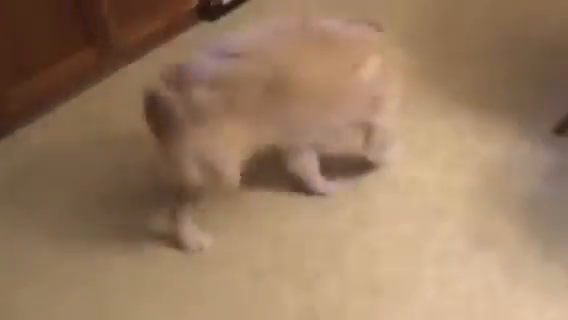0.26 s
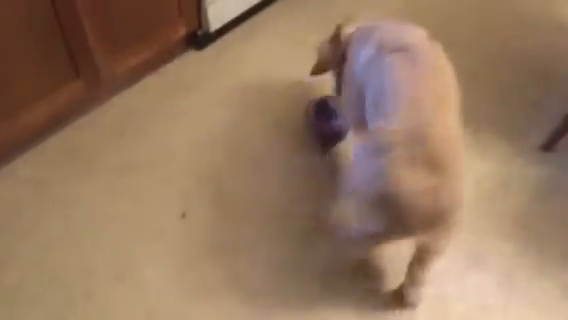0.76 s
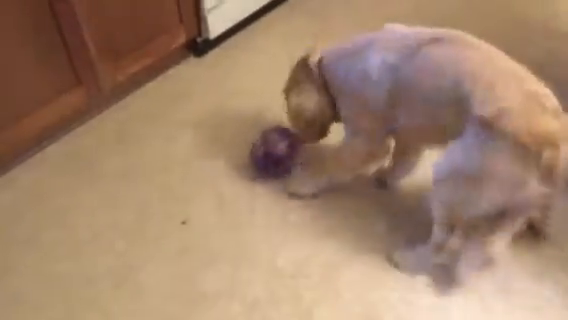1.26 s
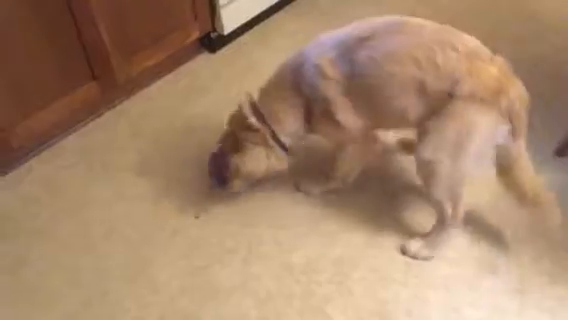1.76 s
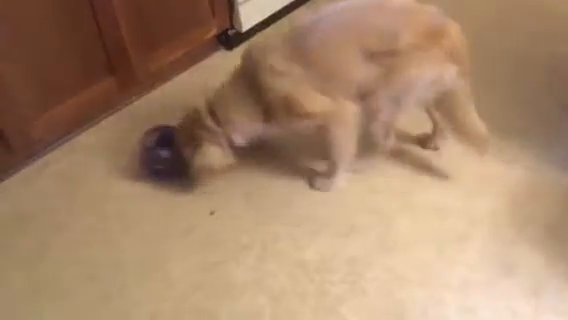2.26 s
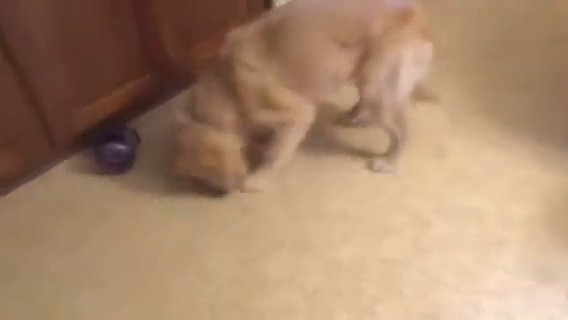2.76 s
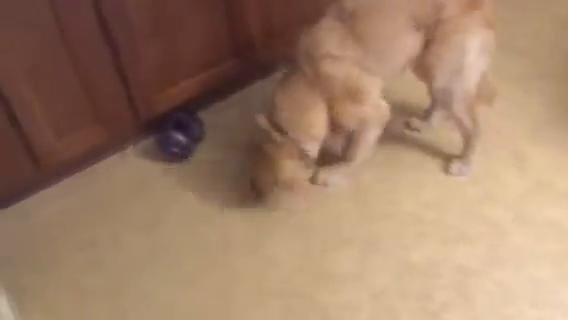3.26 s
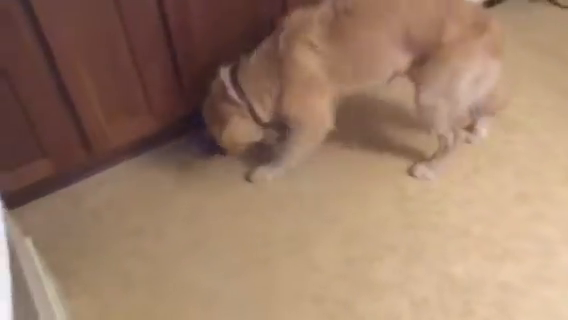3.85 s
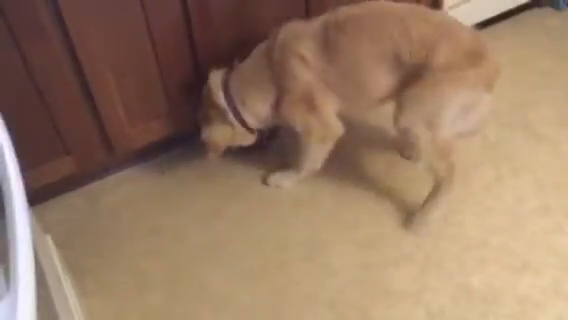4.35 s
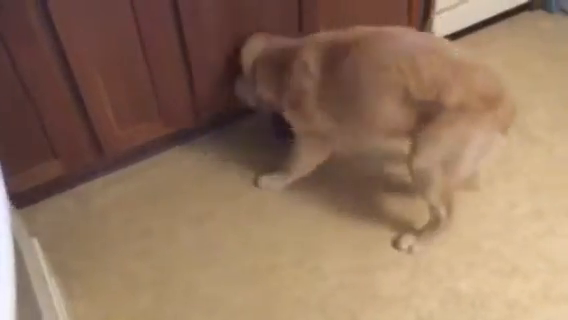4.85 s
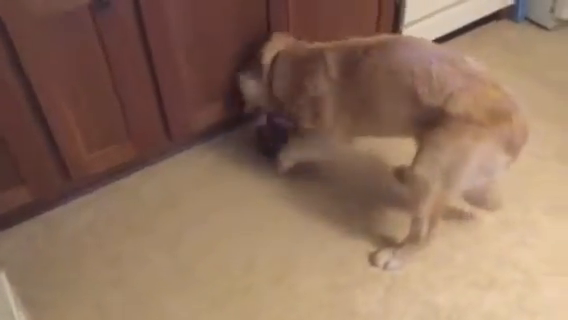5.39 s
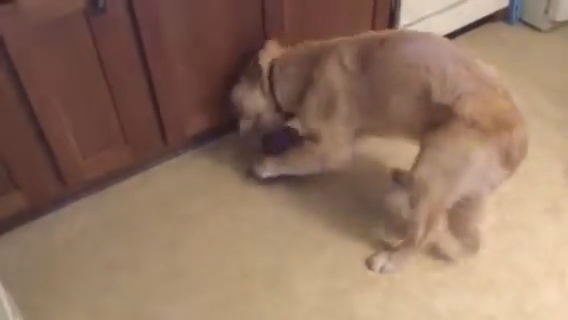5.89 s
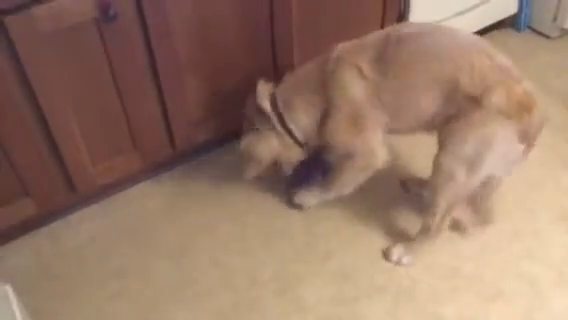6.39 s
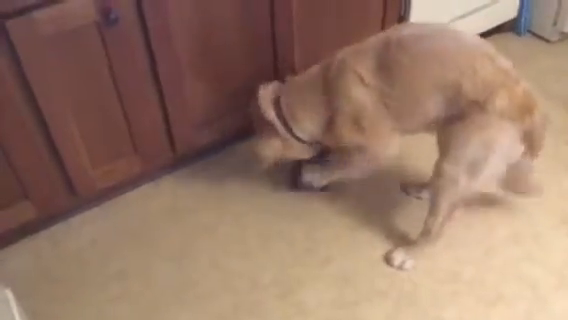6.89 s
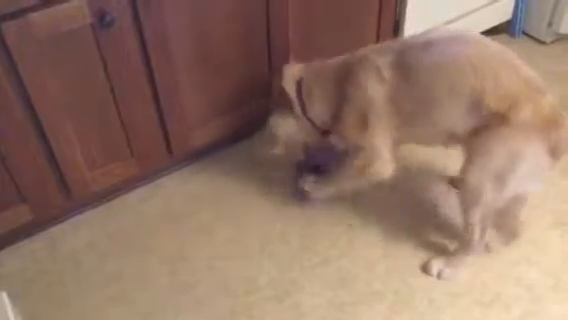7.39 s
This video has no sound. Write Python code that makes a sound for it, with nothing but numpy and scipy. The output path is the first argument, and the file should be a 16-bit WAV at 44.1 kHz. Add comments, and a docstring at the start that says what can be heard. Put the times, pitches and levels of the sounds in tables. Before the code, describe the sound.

A small, lively kitchen with a faint steady low hum, picked up by one small microphone. At 0 s a brief kibble rattle and soft knock fade quickly, leaving light claw ticks and faint scuffs. At about 1.05 s the hollow plastic toy clacks sharply on the floor and a surging rattle and rub begins, with small clacks until 1.9. A fuller low floor knock lands at 1.93, followed by more rattling. Short scrapes lead into a woody cupboard bump at 2.9, then ticks and scrapes, quieter around 3.6. From 4.2 the toy is wedged at the door, rumbling; strong hollow thuds come at 4.6 and 4.7, with smaller bumps to 5.4. Scrapes, clacks and claws stay busy until 6, then thin out. Around 7.05-7.3 dull thuds and the strongest scrape bring the rattle back, ending with a clack at 7.6.

```python
"""In a small bright kitchen a dog noses and paws a hard plastic feeder toy over the floor and into a cupboard door.
Blows ring low modes of floor and door; the hollow shell clacks and pings through its resonances.
Rubbing and tumbling kibble excite the same shell, strokes scrape, claws tick in pairs, the rolling toy rumbles.
Reflections answer all but the rumble and a faint steady hum."""
import sys
import numpy as np
from scipy import signal
from scipy.io import wavfile
from scipy.ndimage import uniform_filter1d

SR = 44100
rng = np.random.default_rng(int(sys.argv[2]) if len(sys.argv) > 2 else 0)


def to_wav(sig):
    """Store sig (one row per channel, or 1-D mono) as 16-bit WAV at the path in sys.argv[1].

    Samples outside -1..1 are clipped; the rate is SR.
    """
    pcm = np.clip(np.atleast_2d(sig), -1, 1) * 32767
    pcm = np.round(pcm).astype(np.int16)
    wavfile.write(sys.argv[1], SR, pcm.T)  # frames by channels


N = 336527
FREQS = np.fft.rfftfreq(4096, 1 / SR)  # Hz, grid for all filter curves

# colour of rubbing and kibble: (frequency [Hz], relative density [dB])
SLIDE_COLOUR = [(200, 7), (600, -21.5), (1000, 4), (1450, 0), (2600, 1.5), (4000, 1.5), (6000, -4),
                (9000, -15), (16000, -28)]


def door_bumps():
    """The toy strikes the cupboard door, which rings in its panel modes."""
    # blows: (time [s], relative level at corner [dB], corner [Hz], loss below corner [dB/octave])
    bumps = [(2.907, -20.5, 328, 20.5), (2.99, -32, 310, 29), (4.381, -40.5, 570, -5.5),
             (4.409, -27.5, 486, 5.5), (4.431, -34.5, 365, 3), (4.611, -18, 290, 8.5),
             (4.639, -32.5, 600, 0), (4.667, -45, 560, -6), (4.72, -19.5, 398, 18.5), (4.742, -34, 600, 23),
             (4.79, -38, 460, -4.5), (4.86, -33.5, 180, 23), (5.048, -42, 162, -6), (5.173, -38, 520, -4),
             (5.215, -30, 92, 0), (5.356, -39.5, 310, 23), (5.399, -39, 475, 0.5)]
    # door modes: (frequency [Hz], relative level [dB], t60 [s])
    modes = [(88.6, -1, 0.3), (120, -19, 0.059), (154.6, -5, 0.26), (189.4, 1, 0.27), (251, -2, 0.059),
             (307.2, 4, 0.096), (344, -7, 0.12), (398, -11, 0.14), (489, -1, 0.076), (568.4, -3.5, 0.11),
             (712, -22, 0.16), (813, -15, 0.067), (953, -22, 0.13)]
    return knocks(bumps, modes, level_db=-3.0, rise_s=0.003, thud_db=-10.0, thud_s=0.023)


def floor_knocks():
    """Toy and paws strike the open floor; floor and toy ring together."""
    # blows, harder contact = higher corner:
    # (time [s], relative level at corner [dB], corner [Hz], loss below corner [dB/octave])
    blows = [(0.003, -45.5, 400, 3), (0.038, -37, 257, 5.5), (0.17, -42, 284, 2), (0.215, -59, 400, -6.5),
             (0.679, -48, 327, 4.5), (1.054, -32, 360, 12.5), (1.084, -42, 382, 17),
             (1.137, -43, 376, 13.5), (1.575, -45.5, 202, 20), (1.931, -24.5, 241, 8.5),
             (1.965, -35.5, 190, 23), (2.025, -40.5, 262, 3.5), (2.303, -47.5, 130, 9), (2.53, -51, 110, 6),
             (2.75, -53, 118, -3), (3.034, -43.5, 320, 0.5), (5.659, -48.5, 150, 6),
             (5.749, -44.5, 480, 3.5), (6.068, -39.5, 161, 28), (6.473, -57, 560, 1.5),
             (7.049, -39.5, 298, 44), (7.077, -36, 184, 8), (7.108, -36, 178, 17)]
    # modes of the floor and the toy on it: (frequency [Hz], relative level [dB], t60 [s])
    modes = [(55, -3.5, 0.32), (85.5, -4.5, 0.32), (123.8, 0, 0.18), (149.8, 2.5, 0.18), (195, -3.5, 0.16),
             (242.5, 0, 0.15), (304.5, -1.5, 0.18), (333.6, 0, 0.15), (675, 2.5, 0.11), (1032, -6.5, 0.16)]
    return knocks(blows, modes, level_db=-2, rise_s=0.0065, thud_db=-9.0, thud_s=0.028)


def knocks(blows, modes, level_db, rise_s, thud_db, thud_s):
    """Each blow drives the low modes by its force spectrum and adds a short dull noise thud."""
    out = np.zeros(N)
    t = np.arange(SR // 2) / SR
    hz, mode_db, t60_s = np.transpose(modes)[:, :, None]
    attack = 1 - np.exp(-t / rise_s)
    rings = amp(mode_db - 60 * t / t60_s) * np.sin(2 * np.pi * hz * t) * attack
    rings *= (-1) ** (np.arange(len(modes)) // 2)[:, None]  # polarity alternates in pairs
    skirts_db = read([(20, -10), (45, -11), (75, -1.5), (650, 6), (1400, -13.5), (5000, -50)], FREQS)
    per_band_db = 10 * np.log10(SR / (FREQS + 20))  # higher bands spread their energy more widely
    for s, *blow in blows:
        ringing = (amp(force_db(hz, *blow)) * rings).sum(0)
        add(out, s, 2 * amp(level_db) * ringing)
        noise = rng.standard_normal(len(t)) * attack * np.exp(-t / thud_s)
        thud = colour(noise, force_db(FREQS, *blow) + skirts_db + per_band_db)
        add(out, s, amp(thud_db) * thud)
    return out


def force_db(hz, level_db, corner_hz, lightness):
    """Blow spectrum: its duration cuts force above the corner; a light blow also lacks bass."""
    softness_db_per_octave = 17.5
    octaves = np.log2(np.clip(hz, 80, 600) / corner_hz)  # slopes act from 80 to 600 Hz
    below_db = lightness * np.minimum(octaves, 0)
    above_db = softness_db_per_octave * np.maximum(octaves, 0)
    return level_db + below_db - above_db


def rattles(gain_db=-1, ring_db=6, ring_width_hz=450, ping_db=-1, ping_s_at_3khz=0.0049):
    """The shell clacks, pinging at one pitch, and the kibble chatters against it."""
    # clacks: (time [s], relative level [dB], middle tilt [dB], treble tilt [dB], strongest ring [Hz])
    clacks = [(0.003, -42.5, 0, -9, 3780), (0.028, -47, 9, -3, 970), (0.611, -53.5, 10.5, -21, 3600),
              (1.05, -38.5, 8, -37, 3470), (1.059, -38.5, -2, -20.5, 3380), (1.085, -47, -21, -1, 3350),
              (1.148, -46.5, 6.5, -5, 2960), (1.334, -52.5, 6, -12, 3900), (1.4, -47.5, -39, -14, 3970),
              (1.452, -57, -15, -17, 5700), (1.511, -46, -8.5, -9, 8600), (1.574, -47, -8.5, -20, 4200),
              (1.635, -48, -14, -16, 3130), (1.701, -50.5, -8, -27, 2880), (1.822, -54.5, -7, -12, 3840),
              (1.855, -55, -7, -12, 3140), (1.933, -44.5, 3, -7, 3230), (2.02, -48, -8, -11, 3700),
              (2.907, -41, 14, -7.5, 3500), (4.207, -46, 5.5, -15.5, 3080), (4.382, -49, 23, -14, 1610),
              (4.412, -47, 5.5, -15, 1020), (4.6094, -35, 3.5, -25, 1705), (4.722, -40, 17.5, -10.5, 2450),
              (5.278, -51.5, -28, -14, 8600), (5.386, -40, -2, -15.5, 3440), (5.404, -54, 23, 7, 3370),
              (5.57, -44.5, -7, -11, 3410), (5.91, -54.5, 4, -21, 2080), (5.98, -57, -11, -24, 2170),
              (6.068, -49.5, 16, -10, 2140), (6.133, -53.5, -25, -9.5, 8250), (6.302, -64, 1, -13, 2300),
              (6.388, -67, -18, -12, 3170), (6.471, -56.5, 2.5, -13, 4200), (6.575, -58, 21, 3, 3030),
              (6.728, -54.5, -8, -26, 5570), (7.209, -49, -12, -1, 3700), (7.272, -44, -27, -19, 3060),
              (7.587, -44.5, -18, -13.5, 3110)]
    out, shell_db = np.zeros(N), shell()
    t = np.arange(len(FREQS)) / SR
    for s, level_db, middle_db, treble_db, ring_hz in clacks:
        tilt = [(150, middle_db + 6), (600, middle_db), (1400, middle_db), (3800, 3.5),
                (10000, treble_db + 5.0), (16000, treble_db - 6.0)]
        clack_db = shell_db + peak(ring_hz, ring_width_hz, ring_db) + read(tilt, FREQS)
        add(out, s, contact(clack_db, level_db + gain_db, touch_s=0.0021, chatter=1.6, chatter_s=0.0077))
        decay = np.exp(-t / ping_s_at_3khz * ring_hz / 3000)  # higher rings die sooner
        ping = np.sin(2 * np.pi * ring_hz * t) * decay * (1 - np.exp(-t / 0.00052))
        add(out, s, amp(level_db + ping_db) * ping)
    return out


def shell():
    """Power response of the hollow shell in dB: resonant peaks on a flat base."""
    # resonances: (frequency [Hz], half-power width [Hz], peak over the base [dB])
    resonances = [(996, 73, 5), (2097, 156, 6.5), (3094, 110, 5.5), (3385, 120, 2.5), (3826, 97, 2.5),
                  (4510, 740, -3.5), (5840, 1400, -2.5), (8650, 640, 1)]
    power = 1
    for hz, width_hz, db in resonances:
        power = power + amp(db) ** 2 / (1 + (2 * (FREQS - hz) / width_hz) ** 2)
    return 10 * np.log10(power)


def slide(shell_db=-2.5, kibble_db=-4, scuff_db=-73, scuff_follow=0.41, surge_db=2,
          sing_hz=2110, sing_width_hz=110, sing_db=5):
    """Surging friction and loose kibble excite the shell; paws scuff faintly as the dog follows."""
    # scuff colour: (frequency [Hz], relative density [dB])
    scuff_colour = [(3000, 7), (6500, 0), (9500, 4.5), (13000, 2.5), (16000, -2)]
    pace_db = motion_db()
    wander = uniform_filter1d(uniform_filter1d(rng.standard_normal(N), size=700), size=400)
    surge = evened(amp(surge_db * evened(wander)))
    # rubbing favours one shell mode
    rub_db = shell() + peak(sing_hz, sing_width_hz, sing_db) + read(SLIDE_COLOUR, FREQS)
    rub = evened(colour(grains(per_s=1100, spread_db=2.5, smooth=1.0), rub_db))
    scuff = evened(colour(grains(per_s=300, spread_db=5.5, smooth=4.4), read(scuff_colour, FREQS)))
    toy = amp(shell_db) * rub * surge + amp(kibble_db) * kibble(per_s=130, spread_db=1.5)
    scuff_gain = amp(scuff_db + scuff_follow * (pace_db - pace_db.mean()))
    return toy * amp(pace_db) + scuff * scuff_gain


def kibble(per_s, spread_db, count=24):
    """Pieces of dry food tumble against the shell, each with its own small ring."""
    out = np.zeros(N)
    shell_db = shell() + read(SLIDE_COLOUR, FREQS)
    pieces = []
    for _ in range(count):
        piece_db = 1.01 * shell_db + uneven(depth_db=9.5)
        pieces.append(evened(colour(burst(0.0024, grain_db=3), piece_db)))
    slots_s = np.arange(0, N / SR, .002)
    chance, heft, which = rng.random((len(slots_s), 3)).T
    for k in np.flatnonzero(chance < per_s * slots_s[1]):
        hit_db = spread_db * min(-np.log(heft[k]), 3)
        add(out, slots_s[k], amp(hit_db) * pieces[int(which[k] * count)])
    return evened(out)


def motion_db():
    """How briskly the dog moves the toy, per sample; sets rubbing, kibble, scuff and rumble levels."""
    # briskness: (time [s], level [dB])
    briskness = [(0.0, -51.5), (0.3, -74), (1.03, -70), (1.08, -51.5), (1.65, -60), (2.08, -52),
                 (2.42, -62.5), (2.91, -58), (3.45, -70), (3.62, -80), (4.05, -73), (4.8, -60), (5.98, -55),
                 (6.2, -73.5), (6.54, -62), (6.9, -64.5), (7.2, -52.5), (7.63, -58.5)]
    return np.interp(np.arange(N) / SR, *np.transpose(briskness))


def scrapes(gain_db=-1, peak_share=0.56, catch_db=2.5):
    """Paw or toy scrapes the floor: dense tiny slips swell and fade with pressure, catching unevenly."""
    # strokes: (start [s], length [s], relative level [dB], middle tilt [dB], treble tilt [dB])
    strokes = [(0.48, .12, -66, 0, 12), (0.66, 0.14, -60, 7, -7), (1.83, .2, -55, -15, -4),
               (2.49, 0.31, -60, 12, -4), (2.68, 0.12, -49.5, 5, -10), (2.85, 0.19, -51, 1, -13),
               (3.185, 0.057, -45.5, 1.5, 2.5), (3.24, 0.14, -54.5, 12, 2), (3.5, 0.082, -55.5, 18, -15),
               (4.05, 0.11, -55.5, 20, -31), (4.2, 0.18, -64, 0, 8), (4.72, 0.28, -49.5, 12, -8),
               (5.155, 0.066, -47, 17, 8), (5.35, 0.19, -48, 10, 3), (5.554, 0.065, -45.5, -11, 9),
               (5.689, 0.34, -58, 2, 14), (5.73, 0.092, -48.5, 12, -20), (5.86, 0.13, -47, -4, -13.5),
               (6.31, 0.059, -66, 2, -14), (6.829, 0.062, -55.5, -12, -13), (6.949, 0.077, -55, -14, -16),
               (7.1, 0.19, -39.5, -6.5, -12), (7.43, 0.092, -52, 7, -11)]
    out, shell_db = np.zeros(N), shell()
    for start_s, length_s, level_db, middle_db, treble_db in strokes:
        t = np.arange(0, length_s, 1 / SR)
        pressure = np.interp(t / length_s, [0, peak_share, 1], [0, 1, 0]) ** 0.7
        catching = amp(catch_db * evened(uniform_filter1d(rng.standard_normal(len(t)), size=130)))
        tilt = [(150, middle_db - 12), (600, middle_db - 1.5), (1400, middle_db), (3800, 0),
                (6000, treble_db / 3), (10000, treble_db), (16000, treble_db - 5)]
        slips = colour(rng.standard_normal(len(t)) * catching, 0.68 * shell_db + read(tilt, FREQS))
        add(out, start_s, amp(level_db + gain_db) * pressure * evened(slips))
    return out


def claws(gain_db=-1.5, second_late_s=0.01, second_db=-9.5):
    """Two claws of a paw land in quick succession; each gives a bright, broad tick and skids a little."""
    # footfalls on floor and toy: (time [s], relative level [dB], middle tilt [dB], treble tilt [dB])
    footfalls = [(0.172, -57, 9, -3), (0.363, -52, 10, -3), (0.794, -66, 0, -12), (0.925, -67, 12, -9),
                 (1.723, -50.5, -34, -12), (2.385, -57.5, 3, -4), (2.464, -52.5, 4, -5),
                 (2.881, -55.5, 11, -12), (3.032, -50.5, 1.5, -4.5), (3.166, -55, -4, -5),
                 (3.396, -54, 12.5, -8), (3.488, -59, 1, -3), (3.795, -66, 4, -12), (3.991, -63.5, 21, -2),
                 (4.022, -56.5, 5.5, -15), (4.314, -49, 5.5, -9.5), (4.49, -56, 10, -13),
                 (4.611, -36.5, 12, -7), (4.894, -49.5, 12, 5.5), (5.349, -42.5, -1, -5),
                 (5.665, -51.5, -8, -5), (6.09, -60.5, -10, -9), (6.689, -57.5, -1, -14),
                 (6.8, -63, -4, -17), (7.047, -53, -1, -13)]
    out = np.zeros(N)
    for s, level_db, middle_db, treble_db in footfalls:
        tilt = [(150, middle_db - 5), (600, middle_db - 9), (1400, middle_db - 3.0), (3800, 0),
                (6500, treble_db / 2 - 0.5), (10500, treble_db + 5), (16000, treble_db - 0.5)]
        for late_s, softer_db in (0, 0), (second_late_s, second_db):
            tick_db = level_db + gain_db + softer_db
            tick = contact(read(tilt, FREQS), tick_db, touch_s=0.0024, chatter=0.77, chatter_s=0.0025)
            add(out, s + late_s, tick)
    return out


def roll(level_db=-58, follow=0.24, wedged_db=14):
    """Small bumps of the rolling toy rumble in the floor, and more strongly in the door while wedged there."""
    # rumble colour: (frequency [Hz], relative density [dB])
    rumble_colour = [(20, -65), (50, 0), (90, -8), (150, 3), (240, -4.5), (310, 4), (420, -10),
                     (700, -17.5), (1500, -49.5)]
    # wedging against the door: (onset [s], where the release line reads 1 [s], end [s])
    wedging = (4.22, 4.18, 5.75)
    onset_s, full_s, end_s = wedging
    t = np.arange(N) / SR
    pace_db = motion_db()
    # abrupt onset, then linear release
    pressure = (t >= onset_s) * np.clip((end_s - t) / (end_s - full_s), 0, 1)
    bumps = evened(colour(grains(per_s=120, spread_db=1.5, smooth=0.64), read(rumble_colour, FREQS)))
    return bumps * amp(level_db + follow * (pace_db - pace_db.mean()) + wedged_db * pressure)


def hum(level_db=-58):
    """Steady low murmur of the room with a little hiss: coloured noise."""
    # murmur colour: (frequency [Hz], relative density [dB])
    murmur_colour = [(20, -11), (55, -1.5), (85, -18.5), (150, 5.5), (240, 3), (315, 6.5), (420, -11),
                     (700, -16), (1100, -17), (2500, -27.5), (6000, -43), (16000, -64)]
    return amp(level_db) * evened(colour(rng.standard_normal(N), read(murmur_colour, FREQS)))


def kitchen(x, wet_db, gap_s=0.00443):
    """Direct sound plus dense reflections, each band dying at its own speed."""
    # reverberation: (frequency [Hz], t60 [s])
    reverberation = [(100, 0.56), (300, 0.27), (1000, 0.45), (4000, 0.35), (9000, 0.3), (15000, 0.25)]
    reflections = rng.choice([-1., 1.], SR) * (rng.random(SR) < 4000 / SR)  # 4000 per second
    reflections *= np.arange(SR) > gap_s * SR
    hz, t, bands = signal.stft(reflections, SR, nperseg=256)
    decay = amp(-60 * t / read(reverberation, hz)[:, None])
    tail = signal.istft(bands * decay, SR)[1]
    return x + amp(wet_db) * signal.oaconvolve(x, tail / np.linalg.norm(tail))[:N]


def contact(ring_db, level_db, touch_s, chatter, chatter_s):
    """One brief touch plus a dying chatter; the level refers to the mean power over 25 ms."""
    force = burst(touch_s, grain_db=2.5) + chatter * burst(chatter_s, grain_db=6)
    sound = colour(force, ring_db + uneven(depth_db=3.0))
    return amp(level_db) * sound / np.sqrt(np.sum(sound ** 2) / (.025 * SR))


def burst(decay_s, grain_db):
    """A dying run of tiny touches of uneven force, with energy 1."""
    t = np.arange(len(FREQS)) / SR
    unevenness = amp(grain_db * rng.standard_normal(len(t)))
    touches = rng.standard_normal(len(t)) * unevenness * np.exp(-t / decay_s)
    return touches / np.linalg.norm(touches)


def grains(per_s, spread_db, smooth):
    """Tiny slips of uneven size over a smooth rub."""
    size = amp(spread_db * np.minimum(rng.exponential(1, N), 4))
    slips = rng.standard_normal(N) * size * (rng.random(N) < per_s / SR)
    return evened(evened(slips) + smooth * rng.standard_normal(N))


def uneven(depth_db, size=24):
    """Each contact spot favours other frequencies; the ripple evens out in the crowded treble."""
    ripple = evened(uniform_filter1d(uniform_filter1d(rng.standard_normal(len(FREQS)), size), size))
    return depth_db * ripple / (1 + (FREQS / 7000) ** 2)


def peak(hz, width_hz, db):
    """Resonant bump in dB over FREQS; width is taken at half its dB height."""
    return db / (1 + (2 * (FREQS - hz) / width_hz) ** 2)


def colour(x, db):
    """Causal minimum-phase filter with the given gains on FREQS: it rings after a click, never before."""
    log_gain = np.log(amp(np.r_[db, db[-2:0:-1]]))
    taps = np.fft.ifft(np.exp(np.conj(signal.hilbert(log_gain)))).real
    return signal.oaconvolve(x, taps)[:len(x)]


def amp(db):
    """Decibels to gain."""
    return 10 ** (np.asarray(db) / 20)


def evened(x):
    """Scales to rms 1."""
    return x / np.sqrt(np.mean(x ** 2) + 1e-20)


def read(points, hz):
    """Interpolates a (frequency, value) table on a log-frequency axis."""
    f, value = np.transpose(points)
    return np.interp(np.log(hz + 1), np.log(f + 1), value)


def add(mix, s, sound):
    """Lays a sound into the mix at time s."""
    part = mix[max(round(s * SR), 0):][:len(sound)]
    part += sound[:len(part)]


def scene():
    """All sources in the kitchen, at one microphone."""
    struck = kitchen(floor_knocks() + door_bumps(), wet_db=-5.5)
    clacking = kitchen(rattles(), wet_db=1.5)
    ticking = kitchen(claws(), wet_db=4)
    rubbing = kitchen(slide() + scrapes(), wet_db=-7.5)
    return (struck + clacking + ticking + rubbing + roll() + hum())[None]


def record(dry):
    """A small microphone loses the deepest bass; then the recorder's band limit."""
    thin = signal.sosfilt(signal.butter(3, 36, "highpass", fs=SR, output="sos"), dry)
    edge_hz = 16300
    lowpass = signal.firwin(401, edge_hz, window=("kaiser", 9), fs=SR)
    return signal.oaconvolve(thin, lowpass[None], "same")


dry = scene()
out = record(dry)
to_wav(out)
```